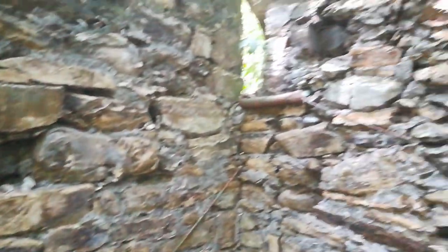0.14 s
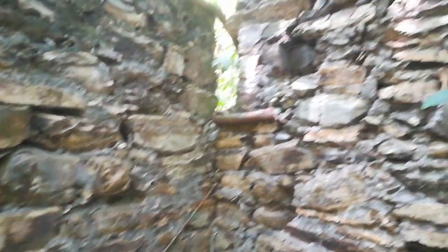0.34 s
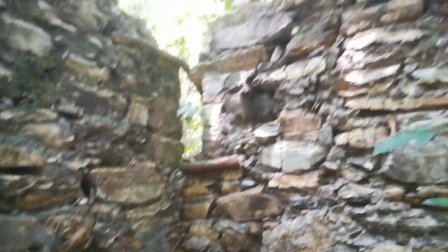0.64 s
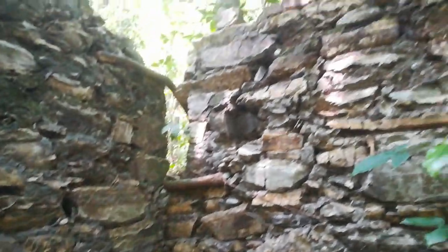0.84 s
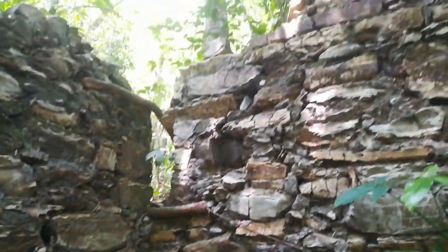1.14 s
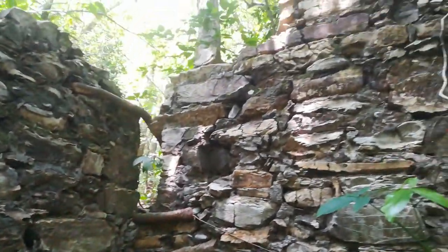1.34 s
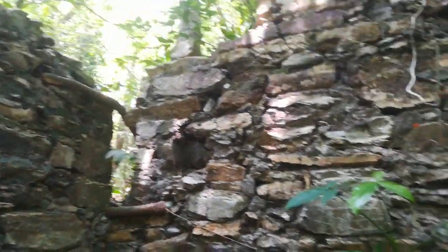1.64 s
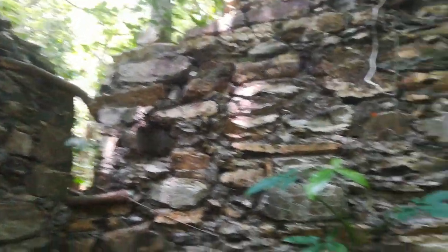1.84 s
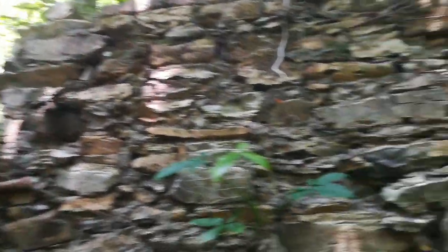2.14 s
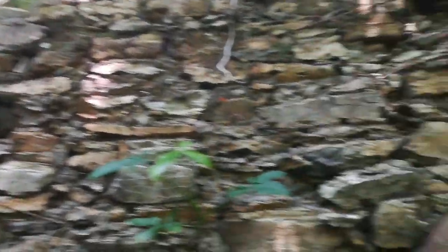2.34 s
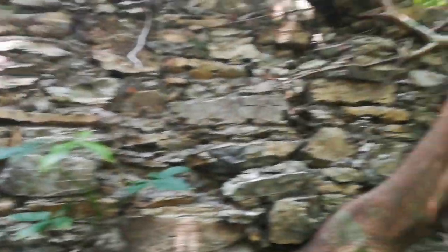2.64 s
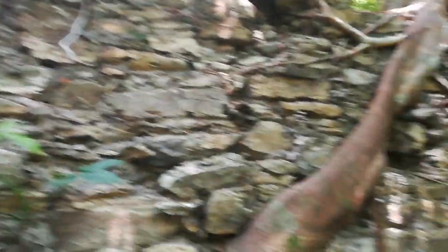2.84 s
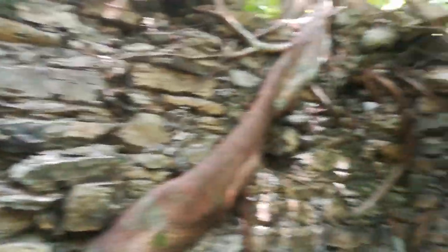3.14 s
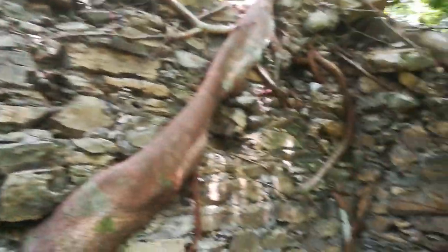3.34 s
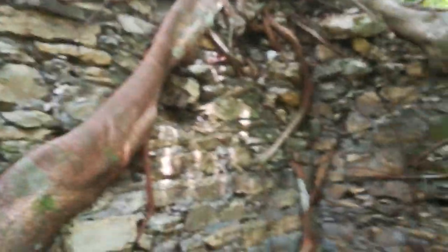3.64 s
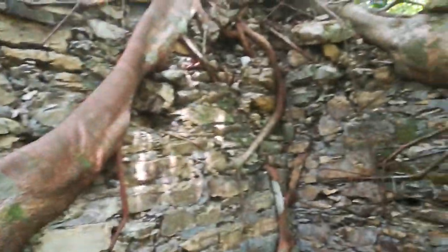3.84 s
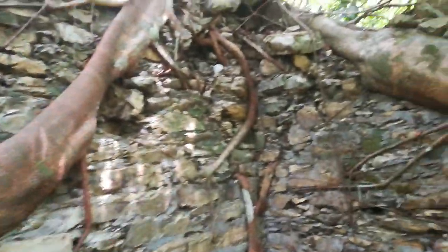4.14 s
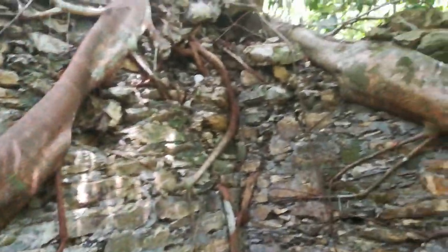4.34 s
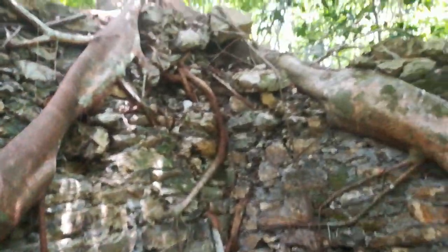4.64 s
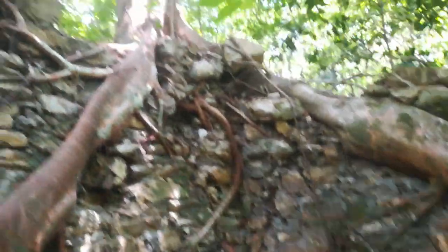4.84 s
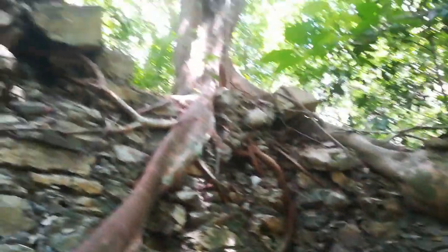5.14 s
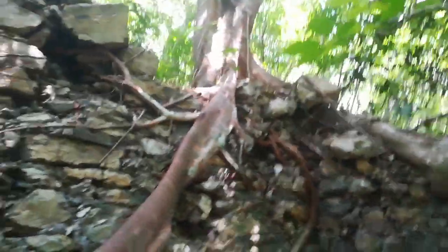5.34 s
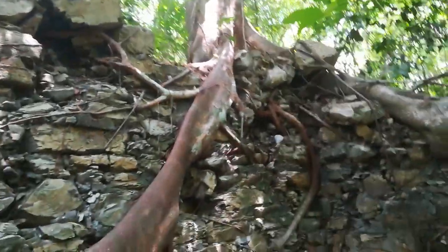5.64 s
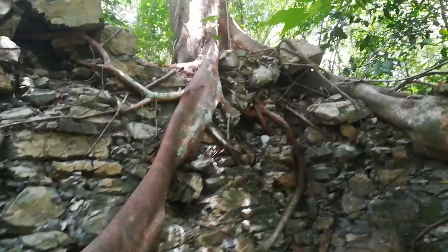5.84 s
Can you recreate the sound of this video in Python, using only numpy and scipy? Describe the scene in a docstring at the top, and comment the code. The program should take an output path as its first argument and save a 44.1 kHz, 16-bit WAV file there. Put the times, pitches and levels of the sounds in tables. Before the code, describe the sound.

A nearby cicada buzzes in rapid pulses to the left, over the high, even drone of more distant insects in the forest. Dull, soft footsteps and jolts come through the hand-held microphone early on, with light rubbing and clicks from the grip. In the second half the close cicada slows and dies away, a few more thumps and ticks follow, and the far chorus carries on.

```python
"""Cicadas at a forest ruin

Cicadas shrill in a tropical forest around stone walls, their buckling tymbals ringing their abdomens.
The nearest, on the left, throbs about 20 times a second, slows and fades into the far chorus.
Someone shifts their footing and turns with a hand-held camera: soft thumps, rubbing and ticks."""
import sys
import numpy as np
from scipy import signal
from scipy.fft import rfft, irfft, next_fast_len
from scipy.io import wavfile
from scipy.ndimage import uniform_filter1d, map_coordinates

SR = 44100
rng = np.random.default_rng(int(sys.argv[2]) if len(sys.argv) > 2 else 0)


def wrap_up_sound(samples):
    """Save the sound to the file named by the first command line argument, as 16-bit audio."""
    columns = np.atleast_2d(samples).T
    # keep every value between -1 and 1, then stretch to whole-number steps
    tamed = np.clip(columns, -1, 1)
    steps = np.round(tamed * 32767).astype(np.int16)
    wavfile.write(sys.argv[1], SR, steps)


N = 264600


def amp(db):
    """Decibels to gain."""
    return 10 ** (np.asarray(db) / 20)


def unit(x):
    """x at rms 1."""
    return x / np.sqrt(np.mean(x ** 2) + 1e-20)


def steady(x, window=1500):
    """x at running rms 1."""
    return x / np.sqrt(np.abs(uniform_filter1d(x ** 2, window)) + 1e-9)


def along(points, hz):
    """(frequency [Hz], value) points read on a log axis."""
    knots_hz, values = np.transpose(points)
    return np.interp(np.log(hz + 1), np.log(knots_hz + 1), values)


def curves(rows):
    """Per-sample curve of each column after the time."""
    times_s, *columns = np.transpose(rows)
    return [np.interp(np.arange(N) / SR, times_s, column) for column in columns]


def wobble(rate_hz):
    """Smooth random curve with knots at rate_hz."""
    knots = rng.standard_normal(int(N * rate_hz / SR) + 4)
    return map_coordinates(knots, [np.arange(N) * rate_hz / SR])


def swells(rows, width_s):
    """Summed power of bell curves at (time [s], level [dB])."""
    t = np.arange(N) / SR
    return sum(amp(db) ** 2 * np.exp(-np.minimum(((t - at_s) / width_s) ** 2, 100)) for at_s, db in rows)


def filtered(x, response):
    """x through the gain response(hz)."""
    size = next_fast_len(N + SR // 2)
    return irfft(rfft(x, size) * response(np.fft.rfftfreq(size, 1 / SR)), size)[..., :N]


def coloured(x, spectrum):
    """x shaped by (frequency [Hz], level [dB]), at rms 1."""
    return unit(filtered(x, lambda hz: amp(along(spectrum, hz))))


def panned(pan_db):
    """Stereo gains; pan is left minus right."""
    return amp(np.outer([.5, -.5], pan_db))


def noise(spectrum, correlation):
    """Coloured stereo noise; channels alike by (frequency [Hz], correlation)."""
    def mid_side_gains(hz):
        angle = np.arccos(np.clip(along(correlation, hz), -1, 1)) / 2
        return np.array([np.cos(angle), np.sin(angle)])
    mid, side = filtered(rng.standard_normal((2, N)), mid_side_gains)
    return coloured(np.array([mid + side, mid - side]), spectrum)


def air():
    """Faint steady rumble and hiss; the hiss leans left."""
    # (frequency [Hz], level [dB])
    spectrum = [(20, 0.5), (45, 2), (70, 6), (110, -8.5), (200, -12), (400, -15.5), (700, -19), (1200, -20),
                (2200, -21.5), (5000, -16.5), (10500, -24.5), (12500, -23), (15600, -27.5)]
    hush = noise(spectrum, [(70, .96), (150, .75), (300, -.069), (640, -.76), (1400, .56), (3000, .011)])
    pan_db = [(1300, -.5), (3000, -.5), (12000, 3.5)]
    return amp(-62) * filtered(hush, lambda hz: panned(along(pan_db, hz)))


def tymbal(rate_hz, jitter_s, scatter_db):
    """A buckling tymbal: clicks slightly uneven in time and size."""
    at = np.flatnonzero(np.diff(np.floor(np.cumsum(rate_hz) / SR + rng.random())))
    late, size = rng.standard_normal((len(at), 2)).T
    at = np.clip(np.round(at + late * jitter_s * SR).astype(int), 0, N - 1)
    return np.bincount(at, amp(scatter_db * size), N)


def scattered(x, t60_s, block=13230):
    """Stereo echoes off leaves and walls; new paths each block as the camera moves."""
    t = np.arange(SR // 5) / SR
    echoes = np.zeros((2, N + len(t)))
    for start in range(0, N, block):
        tail = rng.standard_normal((2, len(t))) * amp(-60 * t / t60_s)
        echo = signal.fftconvolve(x[None, start:start + block], tail, axes=1)
        echoes[:, start:start + echo.shape[1]] += echo
    return unit(echoes[:, :N])


def far_insects(spectrum, rate_hz, flutter_db, count):
    """Several insects, each at its own click rate, blurred by the forest."""
    voices = 0
    for _ in range(count):
        own_hz = rate_hz * np.exp(.12 * rng.standard_normal() + .006 * wobble(5))
        clicks = tymbal(own_hz, jitter_s=.00003, scatter_db=3.5)
        voices += scattered(clicks, t60_s=.097, block=SR) * amp(flutter_db * wobble(28))
    return coloured(voices, spectrum)


def chorus(low_trim_db=-2, high_trim_db=-.5, drift_db=.27, drift_hz=3.01):
    """Two kinds of far cicada hold shrill notes under a small insect's thin sizzle."""
    # (time [s], low level [dB], low pan [dB], high level [dB], high pan [dB])
    cicada_track = [(0, -51.5, 13.5, -54, 2.5), (.9, -51, 12.5, -52.2, 5), (1.8, -54, 18, -50.5, -3.5),
                    (2.4, -52.5, 14, -51, -.5), (3.5, -50.5, 10.5, -51.5, 0), (4.7, -52, 14, -55, 3.5),
                    (5.15, -52.5, 8, -54, -4), (6, -52.5, 11.5, -54.5, 4.5)]
    # (time [s], level [dB], pan [dB])
    sizzle_track = [(.5, -71.5, 10), (1.8, -69, -3), (3.2, -69.5, 3), (4.8, -75.5, 6.5), (5.6, -67.5, -4)]
    # voice spectra: (frequency [Hz], level [dB])
    low_spectrum = [(2000, -45.5), (3000, -23.5), (3600, -15.5), (4100, -15), (4550, -1.5), (4800, -3),
                    (5020, 1), (5350, -1.5), (5700, 1), (6000, -2.5), (6400, -2.5), (6800, -25),
                    (8000, -38), (10000, -42)]
    high_spectrum = [(5000, -35.5), (6200, -6.5), (6560, -8.5), (6750, 0), (6900, -2), (7090, -0.5),
                     (7380, -4), (7600, -8.5), (7850, -8), (8100, -12), (8350, -10.5), (8900, -22),
                     (9700, -28), (12000, -50)]
    sizzle_spectrum = [(10500, -37), (12400, -11), (13500, -18), (14600, -14), (15250, -6), (15700, -6),
                       (16500, -14.5)]
    low_db, low_pan_db, high_db, high_pan_db = curves(cicada_track)
    sizzle_db, sizzle_pan_db = curves(sizzle_track)

    def drifting(db, pan_db):
        return amp(db + drift_db * wobble(drift_hz)) * panned(pan_db)
    low = drifting(low_db + low_trim_db, low_pan_db)
    low *= far_insects(low_spectrum, rate_hz=225, flutter_db=2.5, count=4)
    high = drifting(high_db + high_trim_db, high_pan_db)
    high *= far_insects(high_spectrum, rate_hz=310, flutter_db=1.3, count=3)
    sizzle = drifting(sizzle_db, sizzle_pan_db)
    sizzle *= far_insects(sizzle_spectrum, rate_hz=260, flutter_db=.7, count=3)
    return low + high + sizzle


def handling(rest_db=-71, attack_s=.022, release_s=.081):
    """The hand rumbles through the camera case and rubs it at each shift of grip."""
    # (start [s], length [s], rumble [dB], rub [dB])
    grip_shifts = [(0.394, .22, -49, -69), (0.728, .2, -59, -71.5), (1.31, 0.12, -66, -68.5),
                   (2.177, 0.17, -66, -71), (2.638, .2, -61, -72), (3.334, 0.35, -66, -71.5),
                   (4.297, 0.049, -54.5, -72.5), (4.586, 0.18, -49.5, -69), (4.893, 0.39, -62.5, -70),
                   (5.35, 0.34, -63.5, -71)]
    # (frequency [Hz], level [dB])
    rumble_spectrum = [(15, -26), (30, 5), (55, 0.5), (85, -3.5), (130, -4), (200, -17), (280, -27.5),
                       (500, -50.5)]
    rub_spectrum = [(80, 1.5), (170, -6), (300, -2), (520, -7.5), (800, -12), (2000, -54)]
    t = np.arange(N) / SR
    press, slide = amp(rest_db), 0
    for start_s, length_s, rumble_db, rub_db in grip_shifts:
        age_s = t - start_s
        envelope = np.exp(np.minimum(age_s, 0) / attack_s - np.maximum(age_s - length_s, 0) / release_s)
        press = np.maximum(press, amp(rumble_db) * envelope)
        slide = np.maximum(slide, amp(rub_db) * envelope)
    rumble = press * amp(3.8 * wobble(18)) * noise(rumble_spectrum, [(50, 1), (120, .76), (250, .59)])
    rub = slide * amp(4.5 * wobble(25)) * noise(rub_spectrum, [(150, .4), (300, -.46), (600, -.8)])
    return rumble + rub * panned(-4.5)


def thumps(thud_db=-13, rise_ratio=.73):
    """Steps and jolts come through the arm, rock the camera and thud in its case."""
    # (time [s], level [dB], frequency [Hz], decay [s])
    jolts = [(0.306, -34, 52.7, 0.016), (.43, -32.5, 59, 0.012), (0.495, -31.5, 50.3, .016),
             (0.603, -37, 58, 0.01), (0.644, -39.5, 65, 0.017), (.939, -35, 49, .013),
             (1.253, -34.5, 52, .02), (1.28, -38, 53, 0.012), (1.494, -44, 48.3, .015),
             (2.087, -48, 52, 0.02), (2.644, -36, 58, 0.01), (2.692, -43, 58, 0.012),
             (3.345, -42.5, 59.7, 0.01), (3.741, -48.5, 70, .04), (4.328, -48, 88, 0.018),
             (4.425, -50.5, 45.4, 0.028), (4.629, -43, 47, 0.032), (4.69, -38.5, 57, 0.023),
             (4.751, -40.5, 61, 0.039), (4.991, -43.5, 66, .013), (5.177, -49.5, 57, 0.034)]
    t = np.arange(N) / SR
    rocking, force = np.zeros((2, N))
    for at_s, db, hz, decay_s in jolts:
        age_s = t - at_s
        width_s = np.where(age_s < 0, decay_s * rise_ratio, decay_s)
        pulse = amp(db) * np.exp(-(age_s / width_s) ** 2)
        rocking -= pulse * np.cos(2 * np.pi * hz * age_s)
        force += pulse
    thud = noise(spectrum=[(40, -32), (100, 13.5), (165, -8.5), (260, -13), (450, -23.5), (1200, -54)],
                 correlation=[(80, .31), (160, .51), (300, .32), (500, -1.13)])
    return rocking * panned(-.2) + amp(thud_db) * force * steady(thud) * panned(-1.7)


def ticks(knock_db=-4.5, snap_db=18.5, snap_t60_s=.022, rise_s=.00068, pan_db=-3):
    """Fingers near the right microphone knock the case: a brief ring and a dry snap."""
    # (time [s], level [dB], brightness [dB])
    taps = [(.301, -46.5, -31), (.42, -49, -19), (.528, -42, -28), (2.067, -51.5, -19), (3.336, -58, -12),
            (4.279, -54, -21), (4.609, -46, -24), (5.15, -53.5, -9), (5.166, -50.5, -19), (5.274, -55, -14),
            (5.322, -55.5, -12.5), (5.407, -55, -14), (5.427, -49, -13.5), (5.454, -48.5, -20),
            (5.588, -46, -25), (5.632, -44.5, -26)]
    # (frequency [Hz], level [dB], t60 [s])
    case_modes = [(145, 4.5, 0.03), (226, 1, 0.057), (373, 0, 0.041), (510, -9.5, 0.086), (774, -9, 0.016)]
    t = np.arange(SR // 8) / SR
    stereo_t = t - [[0], [.0009]]  # the case's ends differ more in phase in higher modes
    rise = 1 - np.exp(-t / rise_s)
    knocks, snaps = np.zeros((2, 2, N + len(t)))
    for at_s, db, bright_db in taps:
        start = round(at_s * SR)
        span = slice(start, start + len(t))
        gain = amp(db) * panned(pan_db) * rise
        ring = sum(amp(mode_db - 60 * t / t60_s) * np.sin(2 * np.pi * (hz * stereo_t + rng.random()))
                   for hz, mode_db, t60_s in case_modes)
        twist, shake = rng.standard_normal((2, len(t)))
        snap = np.array([.61 * shake + .58 * twist, .89 * shake - 1.1 * twist])
        knocks[:, span] += gain * amp(knock_db) * ring
        snaps[:, span] += gain * amp(snap_db + bright_db - 60 * t / snap_t60_s) * snap
    snap_spectrum = [(200, -6), (600, 1), (1400, 2.5), (2600, -10), (8000, -28)]
    return knocks[:, :N] + filtered(snaps[:, :N], lambda hz: amp(along(snap_spectrum, hz)))


def throbs(first_s=.04, width_s=.0115, scatter_db=.88):
    """Power of the abdomen's uneven strokes, which slow as the cicada tires."""
    # (time [s], rate [Hz])
    pump_rate = [(0, 21.5), (.5, 22.3), (.9, 22.1), (1.5, 21.25), (2, 19.05), (2.9, 19.5), (3.9, 17.65),
                 (4.1, 12.4), (4.6, 15.6), (5.2, 16)]
    strokes = np.cumsum(curves(pump_rate)[0]) / SR
    strokes -= strokes[round(first_s * SR)]
    times_s = np.flatnonzero(np.diff(np.floor(strokes))) / SR
    levels_db = scatter_db * rng.standard_normal(len(times_s))
    return swells(zip(times_s, levels_db), width_s)


def near_cicada(ring_db=-9, rasp_db=-11.5, ring_depth=1.15, rasp_depth=.58, floor_db=-11.5, echo_db=3):
    """Tymbal clicks rasp and ring the abdomen, whose pumping swells them into throbs."""
    # slackens at the end: (time [s], rate [Hz])
    buckle_rate = [(0, 283), (3.3, 285), (6, 272)]
    # (time [s], level [dB], ring offset [dB])
    song = [(0, -39.5, -6), (.8, -39, -10), (1.6, -37, -5.5), (2.4, -36, -6), (2.9, -38, -5.5),
            (3.9, -37, -10), (4.45, -41, -10), (4.7, -45.5, -6.5), (5.3, -45, -9), (6, -60.5, -11)]
    # song pressing on between throbs: (time [s], level [dB])
    surges = [(.465, -38.5), (.96, -39.5), (1.44, -41.5), (1.84, -39.5), (2.19, -39), (4.46, -43.5),
              (5.16, -48.5)]
    # side as the camera turns: (time [s], pan [dB])
    pan_track = [(0, 6), (.7, 8.5), (1.7, 5), (3.6, 6.5), (4.6, 6)]
    # abdomen resonance, tymbal rasp: (frequency [Hz], level [dB])
    ring_spectrum = [(3500, -42.5), (4130, -11), (4310, -6), (4450, -3.5), (4570, 3), (4680, -3),
                     (4850, -12), (5500, -49)]
    rasp_spectrum = [(2400, -37), (3450, -22), (3880, -1), (4100, -9.5), (4400, -3), (4950, -5.5),
                     (5330, 9), (5620, -13), (5880, -3), (6300, -5.5), (6880, 6.5), (7800, -0.5),
                     (8600, -21.5), (10000, -43)]
    song_db, ring_offset_db = curves(song)
    pan_db, = curves(pan_track)
    rate_hz = curves(buckle_rate)[0] * (1 + .008 * wobble(12))
    clicks = tymbal(rate_hz, jitter_s=.0003, scatter_db=1)
    walls = scattered(clicks, t60_s=.013)
    foliage = amp(echo_db) * scattered(clicks, t60_s=.11)
    buzz = walls + foliage
    power = amp(song_db) ** 2 * (throbs() + amp(floor_db) ** 2) + swells(surges, width_s=.041)
    effort = np.sqrt(np.abs(uniform_filter1d(power, size=SR // 9)))  # slow envelope
    pump = np.sqrt(power) / effort  # fast beat around it
    # the abdomen rings best at full stretch, so the ring throbs deeper than the rasp
    ring = amp(ring_db + ring_offset_db) * pump ** ring_depth * steady(coloured(buzz, ring_spectrum))
    rasp = amp(rasp_db) * pump ** rasp_depth * steady(coloured(buzz, rasp_spectrum))
    # far microphone shaded: (frequency [Hz], pan [dB])
    shade = [(4500, 4.5), (5600, 4.1), (7100, 3.1)]
    return filtered(effort * (ring + rasp), lambda hz: panned(along(shade, hz))) * panned(pan_db)


def scene():
    """Insects, forest air and the noises of carrying the camera."""
    return near_cicada() + chorus() + air() + handling() + thumps() + ticks()


def record(dry, cutoff_hz=15800):
    """The camera's band limit: a brick-wall low-pass."""
    return filtered(dry, lambda hz: hz < cutoff_hz)


dry = scene()
out = record(dry)
wrap_up_sound(out)
```